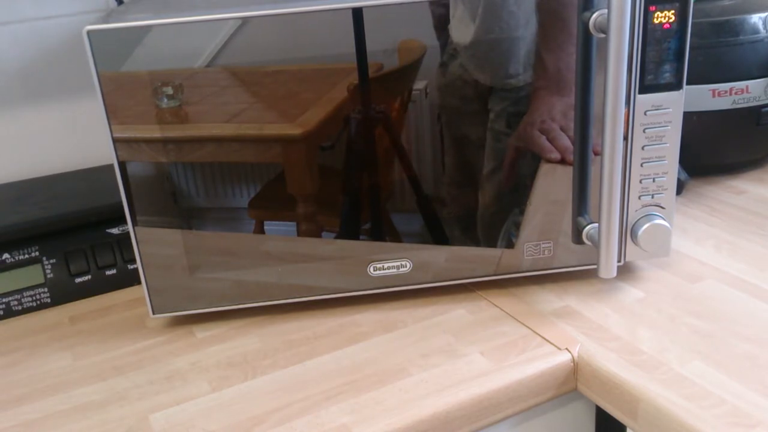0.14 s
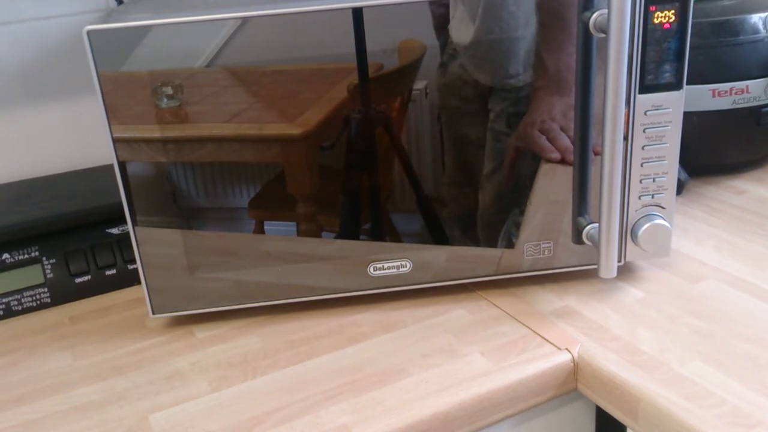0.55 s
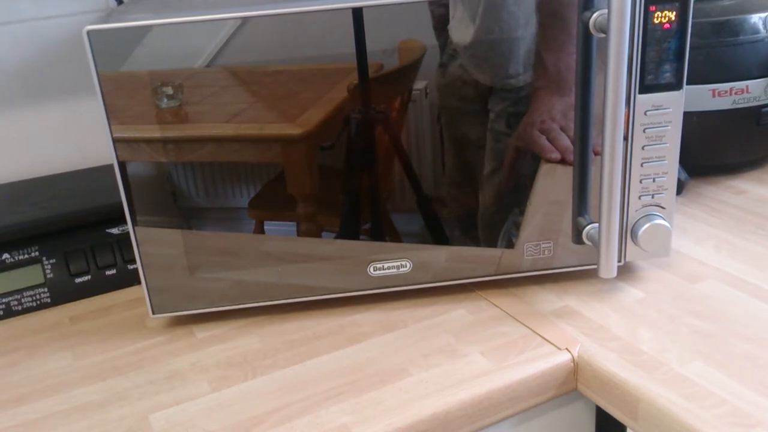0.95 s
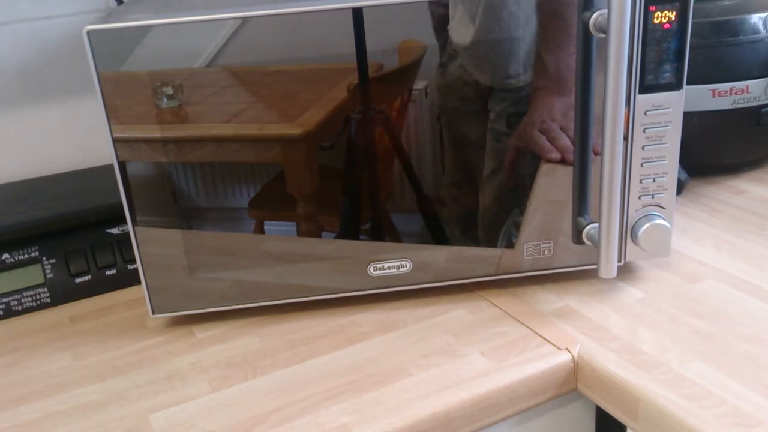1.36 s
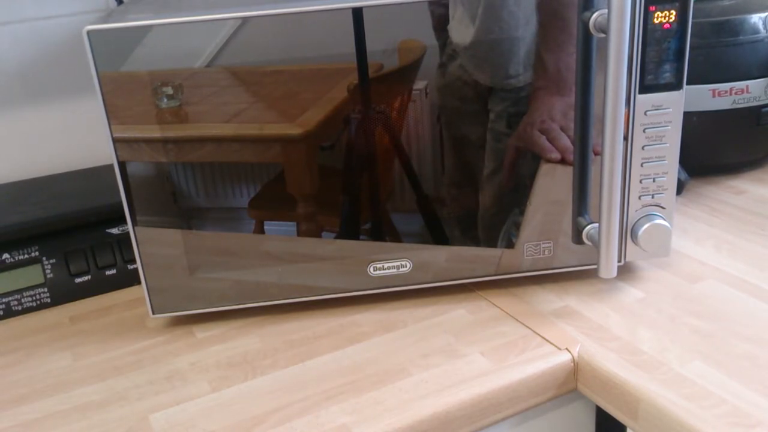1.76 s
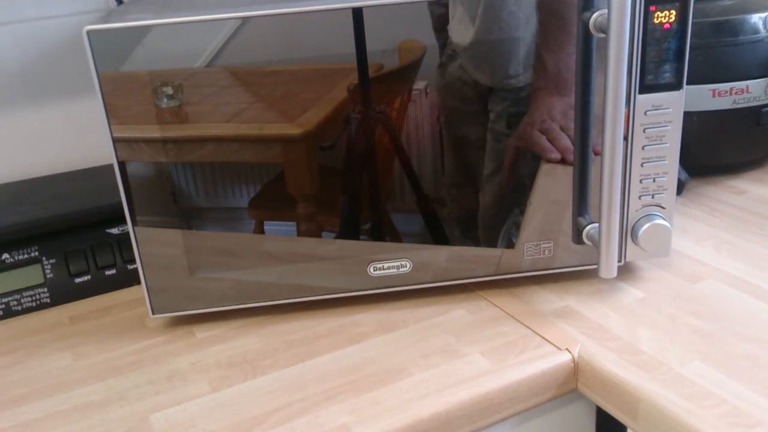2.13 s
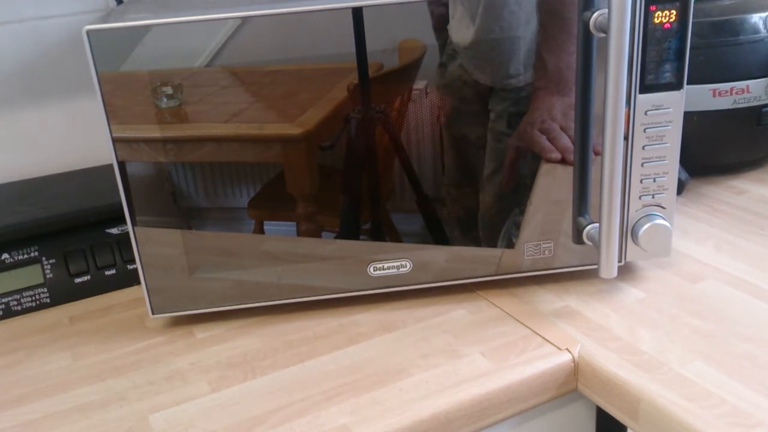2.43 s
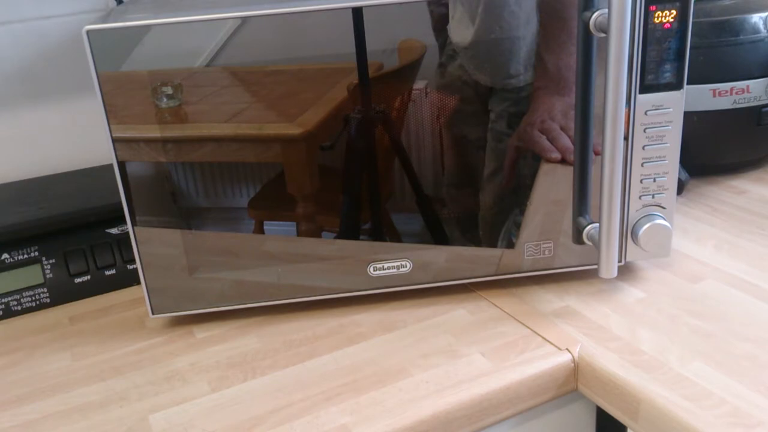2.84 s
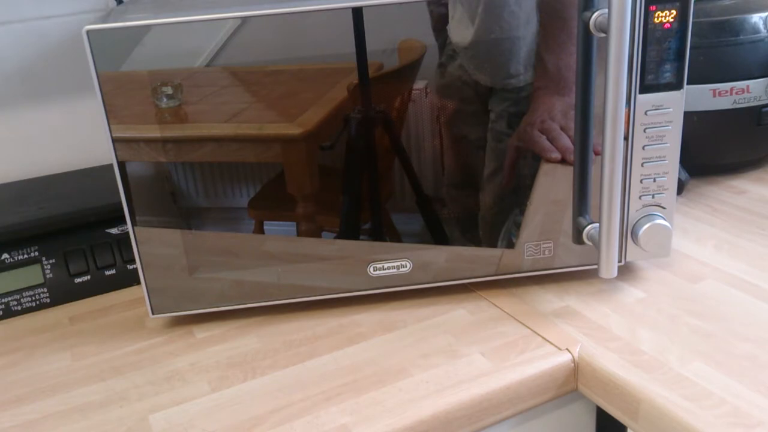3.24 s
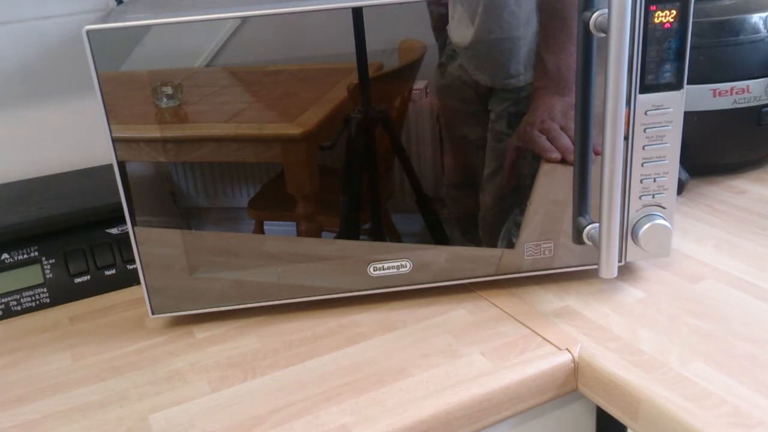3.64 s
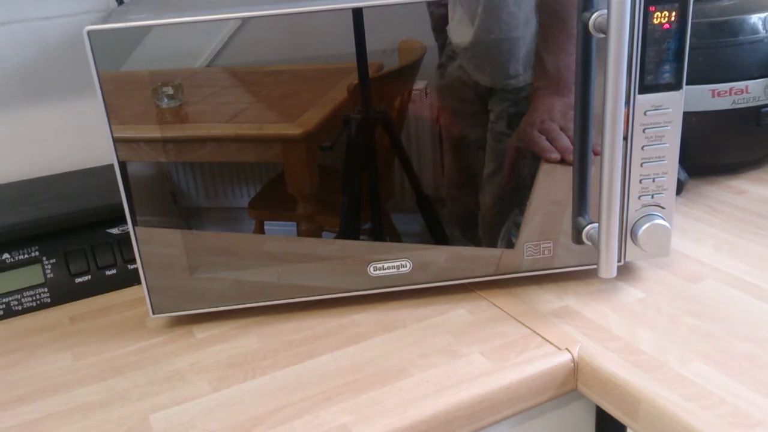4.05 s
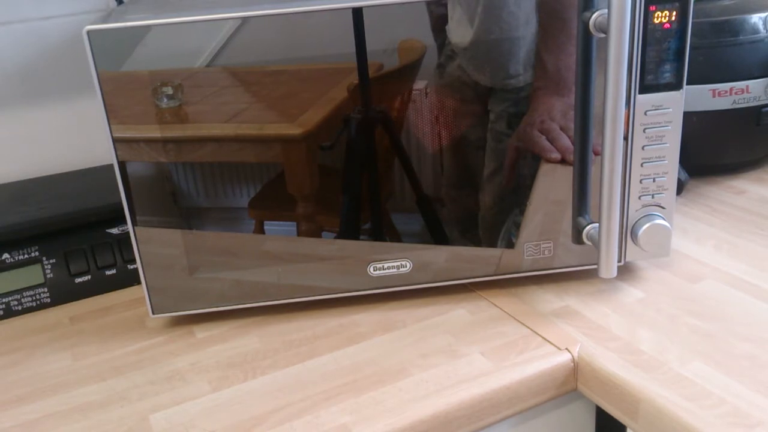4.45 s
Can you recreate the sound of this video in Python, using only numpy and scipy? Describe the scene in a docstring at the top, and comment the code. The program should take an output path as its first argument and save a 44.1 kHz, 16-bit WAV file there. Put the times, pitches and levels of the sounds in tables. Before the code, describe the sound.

Close, continuous drone of a working microwave: firm low-mid mains hum, gentle slow swelling, cooling fan whir and breathy vent noise.

```python
"""A microwave oven's transformer hums and buzzes on a kitchen worktop, close to two microphones.
Hum and buzz are sines on multiples of the mains; some swell and sink as the turntable carries the load.
A four-blade cooling fan whirs as sines on multiples of its slightly hunting shaft speed.
Moving air, made of shaped noise, roars in the hollows of the steel case and hisses from the vents."""
import sys
import numpy as np
from scipy import signal
from scipy.fft import rfft, irfft, next_fast_len
from scipy.io import wavfile
from scipy.ndimage import uniform_filter1d, map_coordinates

SR = 44100
rng = np.random.default_rng(int(sys.argv[2]) if len(sys.argv) > 2 else 0)


def ratio(d):
    """dB to gain"""
    e = np.asarray(d, float) / 20
    return 10 ** e


def store_pcm(level_fs):
    """Save levels as 16-bit WAV."""
    pcm = np.round(np.clip(level_fs, -1, 1) * 32767).astype(np.int16)
    wavfile.write(sys.argv[1], SR, np.atleast_2d(pcm).T)


N = 202330  # length in samples
MAINS_HZ = 50.0305
FAN_HZ = 34.46  # mean shaft turns per second
TURNTABLE_SWING_S = 4.95


def along(hz, at_hz, values):
    """Reads values off a curve drawn on a log frequency axis."""
    return np.interp(np.log(hz + 1), np.log(np.asarray(at_hz) + 1), values)


def wobble(rate, count):
    """Draws smooth random curves through a given rate of knots a second."""
    knots = rng.standard_normal((count, int(N * rate / SR) + 4))
    place = np.arange(N) * rate / SR
    return np.array([map_coordinates(row, [place]) for row in knots])


def swing_db(depth, peak_s):
    """The turning load damps the case to and fro, so a tone builds slowly and sinks faster."""
    lean = 0.45  # radians
    angle = 2 * np.pi * (np.arange(N) / SR - peak_s) / TURNTABLE_SWING_S
    leaning = angle + lean * (1 - np.cos(angle))
    return 20 * np.log10(1 + np.clip(depth, 0, 0.95) * np.cos(leaning))


def tones(turns, table, change_db):
    """Sums multiples of one rotation (in turns), each with its own levels and phase lead."""
    out = np.zeros((2, N))
    start = rng.uniform(0, 2 * np.pi, len(table))
    for (multiple, left_db, right_db, lead), angle, db in zip(table, start, change_db):
        spin = 2 * np.pi * round(multiple) * turns + angle
        left = ratio(left_db) * np.sin(spin + lead / 2)
        right = ratio(right_db) * np.sin(spin - lead / 2)
        out += np.sqrt(2) * ratio(db) * [left, right]  # root two: table levels are rms
    return out


# broad air noise: (frequency [Hz], left density [dB per Hz], right density [dB per Hz])
AIR_NOISE = [(20, -94.5, -95), (75, -102, -102), (218, -94, -93), (460, -94.5, -90.5), (1190, -98.5, -94.5),
             (2460, -96.5, -95), (2840, -101, -100), (4700, -107, -106), (5150, -109, -109),
             (6400, -112, -108), (7660, -111, -107), (8200, -110, -112), (9700, -112, -115),
             (10000, -117, -117), (13100, -122, -123)]
# hollows of the case that the air excites:
# (centre [Hz], width between -6 dB points [Hz], left peak [dB per Hz], right peak [dB per Hz])
CASE_HOLLOWS = [(9.9, 13, -94.5, -79), (39.5, 14, -89.5, -84.5), (118, 72, -91.5, -88.5),
                (167, 26, -89, -83.5), (184, 16, -81, -74), (244.4, 12, -88.5, -88.5),
                (279.6, 18.3, -77.5, -72.5), (371, 42.5, -79.5, -77), (440, 12, -85.5, -87),
                (530, 80, -89.5, -91), (619, 30, -90.5, -88), (661, 37, -86.5, -86.5),
                (705, 44, -87.5, -88), (742, 30, -91, -86.5), (850, 17, -85.5, -91), (943, 17, -93, -85.5),
                (997, 91, -87.5, -86.5), (1393, 19, -96.5, -84.5), (1735, 99, -95.5, -93.5),
                (2550, 200, -102, -101), (4300, 710, -108, -105)]
# likeness of the air noise at the two microphones: (frequency [Hz], correlation [-1 to 1])
AIR_LIKENESS = [(40, .3), (130, 0.94), (400, 0.8), (700, 0.52), (1300, 0.14), (4000, 0.046)]


def air(patchy_db=1.09):
    """Turbulent air is faintly patchy noise, coloured by the resonant hollows of the case."""
    z = signal.stft(rng.standard_normal((2, N + SR)), nperseg=512)[2]
    # patches smeared over frequency, then over time
    field = uniform_filter1d(rng.standard_normal(z.shape[1:]), size=6, axis=0)
    field = uniform_filter1d(field, size=12, axis=1)
    pair = signal.istft(z * ratio(patchy_db * field / field.std()), nperseg=512)[1]
    length = next_fast_len(pair.shape[1])
    hz = np.fft.rfftfreq(length, 1 / SR)

    # blend a shared and an opposed noise to set the likeness
    likeness = along(hz, *np.transpose(AIR_LIKENESS))
    turn = np.arccos(np.clip(likeness, -1, 1)) / 2
    mid, side = rfft(pair / pair.std(), length) * [np.cos(turn), np.sin(turn)]

    at_hz, *broad_db = np.transpose(AIR_NOISE)
    power = np.array([ratio(2 * along(hz, at_hz, db)) for db in broad_db])
    for centre_hz, width_hz, *peak_db in CASE_HOLLOWS:
        peak = ratio(2 * np.array(peak_db))[:, None]
        power += peak / (1 + (2 * (hz - centre_hz) / width_hz) ** 2) ** 2
    return irfft([mid + side, mid - side] * np.sqrt(power * SR / 2), length)[:, :N]


# fan shaft and blade tones:
# (multiple of shaft speed, left typical level [dB], right typical level [dB], left phase lead [radians])
FAN_TONES = [(1, -72.5, -62, 1), (4, -71.5, -67, 0.87), (8, -75, -66, 0.46), (12, -78, -68, 2.1),
             (32, -87, -80.5, 1.2)]


def fan():
    """Shaft and four blades beat the air; the speed hunts a little, which blurs the higher tones."""
    speed = FAN_HZ * (1 + 0.003 * wobble(4, count=1)[0])
    change_db = 2.7 * wobble(4.6, count=len(FAN_TONES))
    change_db[0] += swing_db(depth=0.2, peak_s=3.1)  # the shaft's unbalance shakes the case
    return tones(np.cumsum(speed) / SR, FAN_TONES, change_db)


# weak multiples of the mains: (frequency [Hz], typical level [dB])
BUZZ_LEVEL = [(600, -81.5), (1000, -83), (2000, -84), (3000, -87.5), (4000, -98), (5000, -103),
              (6500, -101), (8000, -96.5), (9000, -100), (10000, -106), (11500, -119)]


def buzz():
    """The other mains multiples are weak and scattered by the kitchen, so unlike at each microphone."""
    scatter_db = 4.5
    strong = [round(row[0]) for row in HUM_TONES]
    multiple = np.array([k for k in range(1, 240) if k not in strong])
    typical_db = along(multiple * MAINS_HZ, *np.transpose(BUZZ_LEVEL))
    db = typical_db + scatter_db * rng.standard_normal((2, len(multiple)))
    angle = rng.uniform(0, 2 * np.pi, db.shape)
    # one mains cycle, read round and round
    cycle = np.arange(4097) / 4096
    sines = np.sin(2 * np.pi * multiple[:, None] * cycle + angle[..., None])
    shape = np.einsum('ck,ckt->ct', ratio(db), sines)
    place = MAINS_HZ * np.arange(N) / SR % 1 * (len(cycle) - 1)
    return np.sqrt(2) * np.array([map_coordinates(row, [place], mode='mirror') for row in shape])


# strong multiples of the mains:
# (multiple, left typical level [dB], right typical level [dB], left phase lead [radians])
HUM_TONES = [(1, -77, -70, 0.7), (2, -63, -62, 0.5), (3, -71, -66, 0.4), (4, -55, -50, 0.4),
             (5, -67, -66, 0.4), (6, -65, -59, 0.0), (7, -68, -67, -0.1), (8, -64, -59, 0.0),
             (9, -76, -75, 0.9), (10, -46, -42, -0.3), (11, -76, -76, 0.6), (12, -70, -74, 0.1),
             (16, -70, -75, -2.6), (17, -73, -83, -1.3), (18, -72, -66, -1.3), (20, -71, -75, -0.9),
             (23, -74, -69, 2.0), (26, -76, -79, -0.5), (38, -85, -72, -0.3), (42, -75, -91, 0.3),
             (44, -72, -83, 1.3), (45, -78, -85, 0.1), (54, -79, -81, -1.0), (67, -92, -82, 0.5),
             (89, -82, -89, -0.3), (145, -89, -80, 1.9)]
# multiples that swell with the turntable, multiple: (depth [0 to 1], time of greatest strength [s])
HUM_SWELL = {2: (0.14, 3.3), 4: (.02, 1.4), 6: (0.58, 2.98), 7: (.65, .7), 8: (0.16, 1.5), 10: (0.035, 3.5),
             18: (0.22, 3.8), 23: (.2, 3.7)}


def transformer():
    """The core hums on strong mains multiples of steady pitch and slowly changing strength."""
    settle_db, settle_s = 1.9, 0.81  # starting excess and its decay time constant
    waver = wobble(2, count=8)
    change_db = []
    for k, row in enumerate(HUM_TONES):
        if row[0] in HUM_SWELL:
            change_db.append(swing_db(*HUM_SWELL[row[0]]))
        else:
            change_db.append(1.4 * waver[k % len(waver)])
    # the loudest tone starts a little strong and settles
    loudest = np.argmax([row[2] for row in HUM_TONES])
    change_db[loudest] += settle_db * np.exp(-np.arange(N) / SR / settle_s)
    return tones(MAINS_HZ * np.arange(N) / SR, HUM_TONES, change_db)


def scene():
    """The running oven, from the air behind to the transformer in front."""
    return air() + fan() + buzz() + transformer()


def low_pass(x):
    """Removes everything above the highest recorded frequency."""
    return signal.sosfilt(signal.butter(12, 14230, fs=SR, output="sos"), x)


def record(dry):
    """The two microphones' sound, as the camera delivers it."""
    return low_pass(dry)


dry = scene()
out = record(dry)
store_pcm(out)
```